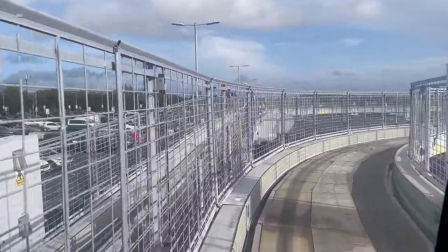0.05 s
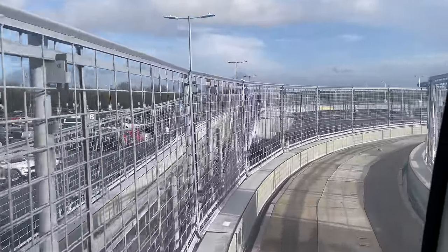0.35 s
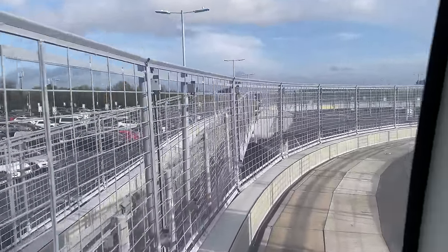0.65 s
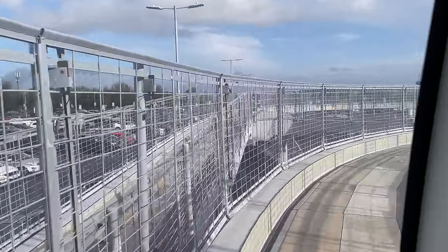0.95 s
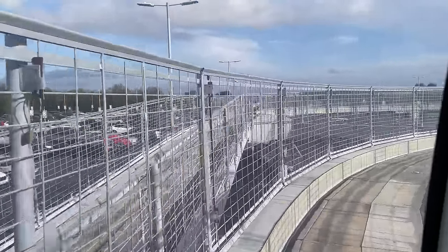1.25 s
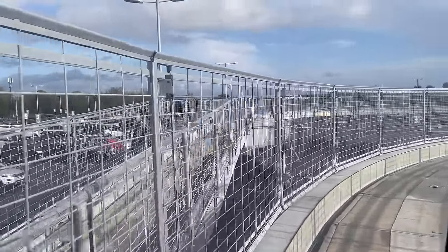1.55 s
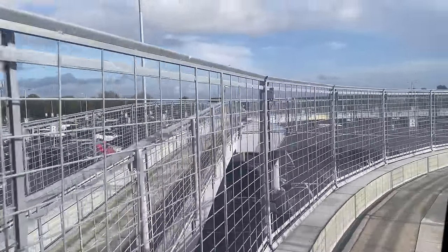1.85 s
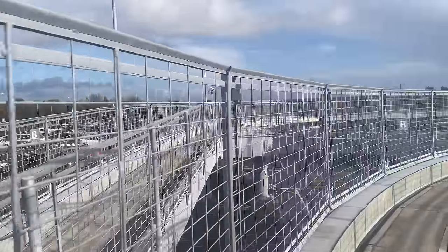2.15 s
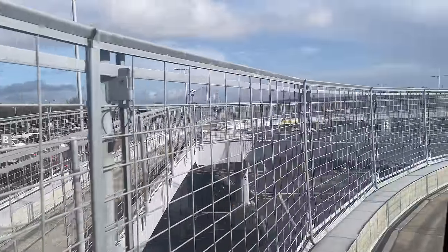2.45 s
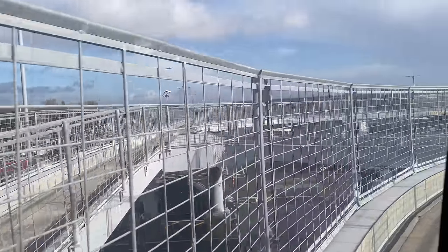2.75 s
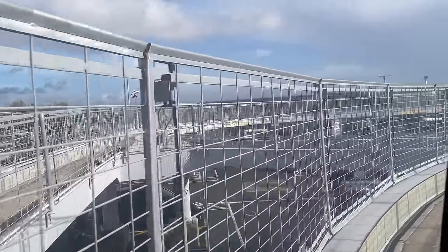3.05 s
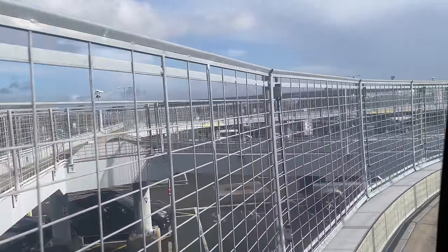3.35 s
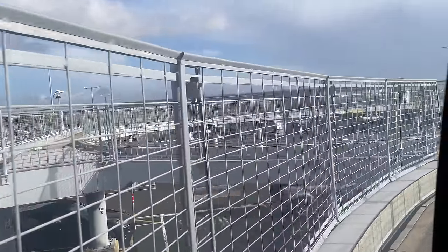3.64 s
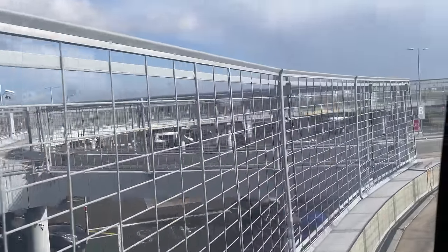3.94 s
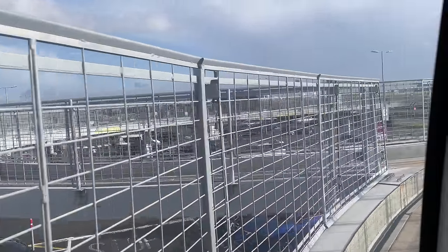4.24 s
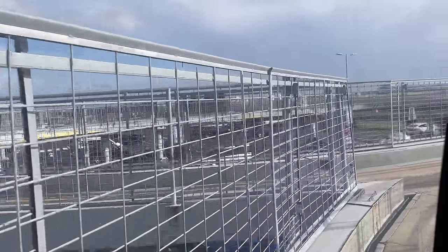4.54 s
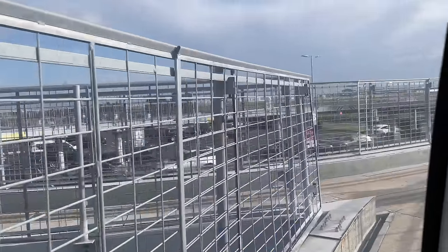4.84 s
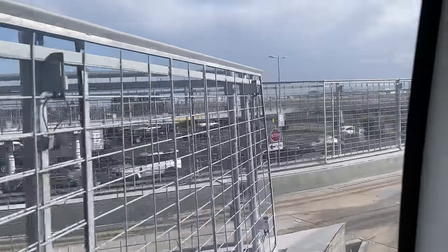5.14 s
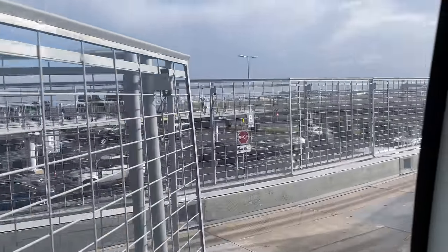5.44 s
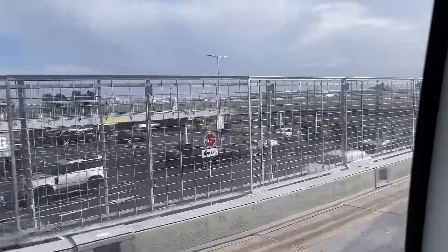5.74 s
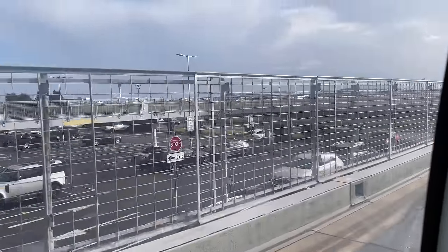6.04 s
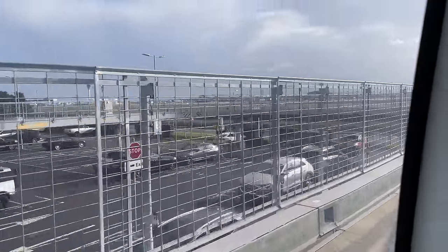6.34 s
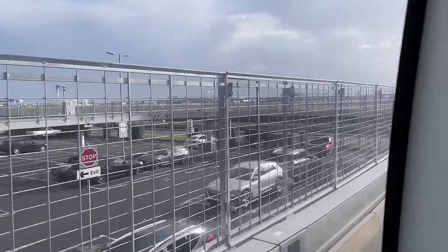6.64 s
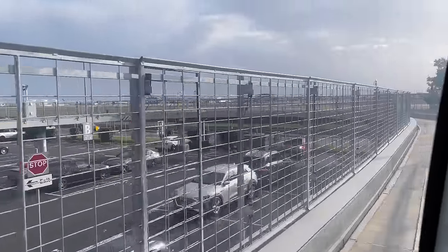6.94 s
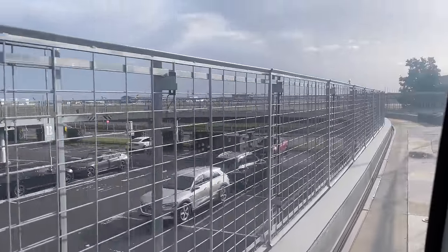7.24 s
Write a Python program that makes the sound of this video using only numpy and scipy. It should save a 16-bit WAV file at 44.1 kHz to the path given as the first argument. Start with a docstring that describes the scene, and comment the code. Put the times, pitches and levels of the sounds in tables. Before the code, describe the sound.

Steady low rumble inside a small vehicle on rubber tyres, with dull bumps over joints and light plastic rattles and clicks.

```python
"""Inside a small electric pod rolling on rubber tyres round a concrete guideway. From the start the road
shakes the body and makes the cabin boom, the tyres roar through its panels and thump over joints, and a
hard tick comes back with the turning wheels. Loose trim rattles and clicks in the bare, ringing cabin,
loudest at 1.4 s. At 3.4 s the coarsest concrete swells the roar and a hum. From 4.4 s the body shudders
harder and joints crowd in; later the trim squeaks, and the two heaviest thumps land near 7.2 s."""
import sys
import numpy as np
from scipy import signal
from scipy.fft import rfft, irfft, next_fast_len
from scipy.io import wavfile
from scipy.ndimage import uniform_filter1d, map_coordinates

SR = 44100
rng = np.random.default_rng(int(sys.argv[2]) if len(sys.argv) > 2 else 0)


def file_out(sig):
    """Save sig as 16-bit WAV at sys.argv[1]."""
    # one column per channel
    cols = np.atleast_2d(sig).T
    # limit, then scale
    lim = np.clip(cols, -1, 1)
    pcm = np.round(lim * 32767).astype(np.int16)
    wavfile.write(sys.argv[1], SR, pcm)


N = 321489


def amp(db):
    """Decibels to gain."""
    return 10 ** (np.asarray(db) / 20)


def unit(x):
    """Scale to rms 1."""
    return x / np.sqrt(np.mean(x ** 2) + 1e-20)


def along(points, hz):
    """Read (frequency, value) points on a log-frequency axis."""
    f, v = np.transpose(points)
    return np.interp(np.log(hz + 1), np.log(f), v)


def bell(hz, centre, octaves):
    """An EQ bell of height 1 on a log-frequency axis."""
    return np.exp(-.5 * (np.log2((hz + 1) / centre) / octaves) ** 2)


def envelopes(rows):
    """One envelope, a value per sample, for each column after the time."""
    times, *columns = np.transpose(rows)
    return [np.interp(np.arange(N) / SR, times, column) for column in columns]


def wobble(rate, size=N):
    """Smooth random modulation, rate knots a second."""
    knots = rng.standard_normal(int(size * rate / SR) + 4)
    return map_coordinates(knots, [np.arange(size) * rate / SR])


def filtered(x, response):
    """Filter x by a response given as a function of frequency."""
    n = x.shape[-1]
    padded = next_fast_len(n + 8192)
    return irfft(rfft(x, padded) * response(np.fft.rfftfreq(padded, 1 / SR)), padded)[..., :n]


def eq(x, curve):
    """Shape x with a curve of (frequency [Hz], gain [dB]) points."""
    return filtered(x, lambda hz: amp(along(curve, hz)))


def add(track, s, sound):
    """Mix a sound into a track at time s."""
    part = track[..., max(round(s * SR), 0):][..., :sound.shape[-1]]
    part += sound[..., :part.shape[-1]]


def stereo_noise(side_db, size=N):
    """Mid/side white noise; side_db sets the width."""
    mid, side = rng.standard_normal((2, size))
    return np.array([mid + amp(side_db) * side, mid - amp(side_db) * side])


def noise_bed(spectrum, side_db):
    """Coloured stereo noise whose slow level stays at rms 1."""
    x = eq(stereo_noise(side_db), spectrum)
    power = uniform_filter1d(np.mean(x ** 2, axis=0), size=SR // 8)
    return x / np.sqrt(np.abs(power) + 1e-20)


def ringing(modes, side_db):
    """Stereo noise of rms 1 in narrow resonances with steep skirts."""
    response = lambda hz: sum(amp(db) / (1 + ((hz - centre) / width) ** 2) for centre, width, db in modes)
    return unit(filtered(stereo_noise(side_db), response))


# reverb decay of the bare cabin (frequency [Hz], t60 [s])
CABIN_DECAY = [(300, 1), (1300, 0.23), (3500, 0.23), (9000, 0.3), (14000, 0.022)]
def cabin_tail(build_s=0.0009):
    """A fresh diffuse stereo tail of the cabin, energy about 1 a side."""
    hz, t, bands = signal.stft(rng.standard_normal((2, SR // 3)), SR, nperseg=256)
    decay = amp(-60 * t / along(CABIN_DECAY, hz)[:, None])
    tail = signal.istft(bands * decay, SR, nperseg=256)[1]
    tail *= 1 - np.exp(-np.arange(tail.shape[1]) / SR / build_s)  # reflections take a moment to gather
    return tail / np.linalg.norm(tail[0])


def reverb(x):
    """The cabin's stereo answer to a mono sound, fully wet."""
    return signal.fftconvolve(x[None], cabin_tail(), axes=1)


def near_walls(x, echo_db=-3, count=10):
    """Windows and seat backs return weak early copies, which colour the treble unevenly."""
    echoes = np.zeros((2, SR // 40))
    delays = rng.integers(SR // 1000, SR // 40, (2, count))
    echoes[[[0], [1]], delays] = amp(echo_db) * rng.choice([-1, 1], (2, count)) / np.sqrt(count)
    echoes[:, 0] = 1  # direct path
    return signal.fftconvolve(x, echoes / np.linalg.norm(echoes[0]), axes=1)[:, :N]


# tone of the trim, shared by tremble, clicks and rattles (frequency [Hz], gain [dB])
TRIM_EQ = [(400, -15), (1000, -8.5), (1600, 0), (2200, -1.5), (3000, -5), (4200, -4), (5500, -10),
           (7200, -13), (9400, -17.5), (11000, -20.5), (13000, -23.5), (15000, -38)]
# fader ride of the trembling fittings, highest as the pod leaves the bend (time [s], level [dB])
TREMBLE_LEVEL = [(0.0, -75.5), (4.0, -74.5), (4.7, -65), (5.8, -69.5), (6.4, -61), (6.85, -72.5),
                 (7.29, -62.5)]
def tremble(per_s=45, spread_db=4, direct_db=-12):
    """Small fittings touch at irregular moments: a fine chatter, heard mostly off the walls."""
    moments, sizes = rng.uniform(size=N), rng.standard_normal(N)
    touches = (moments < per_s / SR) * np.sign(sizes) * amp(spread_db * np.minimum(np.abs(sizes), 2))
    chatter = amp(direct_db) * touches + reverb(touches)[:, :N]
    return amp(envelopes(TREMBLE_LEVEL)[0]) * unit(eq(chatter, TRIM_EQ))


# squeaks of the trim (time of crest [s], level [dB], half length [s], pitch [Hz])
SQUEAKS = [(5.555, -56, 0.016, 2998), (5.968, -62, .007, 4670), (6.188, -62, .008, 4620),
           (6.646, -58, 0.037, 2078)]
def squeaks(waver=0.013, catch_db=3):
    """Rubbing trim sings for an instant on one unsteady note."""
    out, t = np.zeros(N), np.arange(N) / SR
    for s, db, half, hz in SQUEAKS:
        phase = 2 * np.pi * np.cumsum(hz * (1 + waver * wobble(120))) / SR
        swell = np.exp(-.5 * ((t - s) / half) ** 2)
        out += amp(db + catch_db * wobble(100)) * np.sin(phase) * swell
    return out


# dull and bright swishes are broader (centre [Hz], width [octaves])
SWISH_WIDTH = [(700, 0.51), (1400, 0.22), (4000, 0.77)]
# top-end roll-off of a swish (frequency [Hz], gain [dB])
SWISH_ROLLOFF = [(9700, -0.5), (11000, -7), (12600, -9.5), (13600, -14.5), (15000, -51.5)]
# soft swishes of noise (time of crest [s], level [dB], half length [s], centre [Hz])
SWISHES = [(0.077, -70, 0.037, 1980), (0.678, -61, .06, 4100), (1.303, -51.5, 0.064, 1360),
           (1.52, -40, 0.03, 700), (1.824, -46, 0.05, 1370), (1.829, -60, 0.05, 3080),
           (2.246, -45, 0.038, 1320), (2.274, -58.5, 0.015, 6360), (2.922, -62.5, 0.1, 5900),
           (3.378, -51.5, 0.14, 1420), (3.947, -59, 0.054, 6800), (4.301, -60.5, 0.085, 7100),
           (6.123, -57, 0.018, 2580), (6.329, -64, 0.032, 4400), (6.467, -46.5, 0.034, 1110)]
def swishes(grain_db=2):
    """Grainy bands of noise swell and fade; the dull one at 1.5 s is a tyre's slap on a joint."""
    out, t = np.zeros((2, N)), np.arange(-SR // 2, SR // 2) / SR
    for s, db, half, centre in SWISHES:
        octaves = along(SWISH_WIDTH, centre)
        band = lambda hz: bell(hz, centre, octaves) * amp(along(SWISH_ROLLOFF, hz))
        swell = np.exp(-.5 * (t / half) ** 2)
        swish = unit(filtered(rng.standard_normal((2, len(t))), band)) * swell
        add(out, max(s + t[0], 0), amp(db) * swish[:, t >= -s])
    return out * amp(grain_db * wobble(90))


# tone of the midrange rush and of the hiss on top (frequency [Hz], gain [dB])
RUSH_EQ = [(500, -30.5), (950, 2), (1250, 2.5), (1700, -3.5), (2300, -8.5), (3200, -16), (4500, -24),
           (8000, -45.5), (15000, -81.5)]
HISS_EQ = [(1200, -21.5), (2500, 0.5), (4000, 1.5), (5500, 1), (7500, -4), (9700, -3), (10800, -11),
           (12300, -6.5), (13500, -31), (15000, -47.5)]
def air(rush_db=-51, usual_roar_db=-40.5, follow=0.52, hiss_db=-69, flutter_db=1.85):
    """A diffuse rush that grows a little on coarse concrete, under a fine hiss; both flutter slightly."""
    coarseness_db = envelopes(ROAD_COARSENESS)[1] - usual_roar_db
    rush = amp(rush_db + follow * coarseness_db) * noise_bed(RUSH_EQ, side_db=0)
    flutter = amp(flutter_db * wobble(11))
    hiss = amp(hiss_db) * noise_bed(HISS_EQ, side_db=-1)
    return flutter * (rush + hiss)


# a fitting sticks and slips (time [s], level [dB], pitch [Hz])
CLICKS = [(0.0385, -44.5, 2020), (0.3605, -45, 1990), (2.0602, -47, 1730), (2.1692, -53, 1660),
          (2.4227, -43.5, 2010), (2.4332, -47, 2000), (2.4426, -37.5, 2310), (3.0622, -43, 2100),
          (3.4005, -38, 2120), (3.4112, -37, 1870), (4.135, -50, 2240), (4.1505, -48, 2170),
          (4.156, -42, 2250), (4.7112, -50, 2260), (4.7858, -45, 2440), (4.8098, -44, 2130),
          (5.6384, -38.5, 2470), (5.8235, -48.5, 2970), (6.344, -59, 6000), (6.457, -47.5, 7700),
          (6.5184, -42, 2000), (7.1212, -53, 2000)]
def clicks(t60=0.0066, rise_s=0.00041, crack_db=-17, room_db=-3):
    """Each slip of the fitting is one quickly damped note with a little crack and some cabin reverb."""
    out, t = np.zeros((2, N)), np.arange(SR // 20) / SR
    envelope = 1000 ** (-t / t60) * (1 - np.exp(-t / rise_s))
    for s, db, hz in CLICKS:
        crack = amp(crack_db) * rng.standard_normal(len(t))
        click = eq((np.sin(2 * np.pi * hz * t) + crack) * envelope, TRIM_EQ)
        click = amp(db) * click / np.abs(click).max()
        add(out, s, click)
        add(out, s, amp(room_db) * reverb(click))
    return out


# ring of one tick (frequency [Hz], level [dB], t60 [s])
TICK_MODES = [(650, -10.5, 0.02), (895, -5, 0.012), (1180, -0.5, 0.01), (1299, 1, 0.0095),
              (1530, -4.5, 0.008)]
# light touch, blow and two window echoes (time from the blow [s], level [dB])
TICK_TAPS = [(-0.004, -11), (0, -3.5), (0.008, -6.5), (0.017, -13.5)]
# wheel ticks, about four a second with gaps (time [s], level [dB])
WHEEL_TICKS = [(0.0991, -38.5), (0.385, -39.5), (0.647, -39), (0.8596, -34.5), (1.242, -39.5),
               (1.9587, -34), (2.4892, -39), (2.7055, -35.5), (3.144, -33), (3.6025, -37.5),
               (3.8866, -40.5), (4.081, -37), (4.309, -35), (4.576, -37.5), (5.042, -37), (5.2455, -32.5),
               (5.5231, -31.5), (5.764, -37.5), (5.9598, -41.5), (6.4479, -40.5)]
def wheel_ticks(gain_db=5, rise_s=0.0024, vary_db=1.2, detune=0.051):
    """A short hard tick of the turning wheels; a window throws it back before the cabin takes it up."""
    out, t = np.zeros((2, N)), np.arange(SR // 2) / SR
    for s, db in WHEEL_TICKS:
        ring = np.zeros(len(t))
        for hz, mode_db, t60 in TICK_MODES:
            strength = amp(mode_db + rng.normal(0, vary_db))
            ring += strength * np.sin(2 * np.pi * hz * rng.normal(1, detune) * t) * 1000 ** (-t / t60)
        ring *= 1 - np.exp(-t / rise_s)
        ring = amp(db + gain_db) * ring / np.abs(ring).max()
        for delay, tap_db in TICK_TAPS:
            add(out, s + delay, amp(tap_db) * ring)
        add(out, s, reverb(ring))
    return out


# resonances of the trim panels (frequency [Hz], level over the broad clatter [dB])
TRIM_MODES = [(1790, 0.5), (2100, 2), (2500, 1.5), (2900, 4), (3350, 0), (3800, -1), (4550, -4)]
def trim_ring(hz, width_hz=110, vary_db=3, detune=0.034):
    """Ringing response of the trim panels; each rattle finds the resonances a little different."""
    damping = 1j * hz * width_hz
    modes = [(f * rng.normal(1, detune), db + vary_db * rng.standard_normal()) for f, db in TRIM_MODES]
    return 1 + sum(amp(db) * damping / (f * f - hz * hz + damping) for f, db in modes)


def chatter(length_s, count=5, first_touch=0.33, dying=3.15, direct_db=-15, direct_hz=3600, grit_db=0.5):
    """A quick run of gritty contacts: dull on the direct path, bright off the cabin's hard walls."""
    run, t = np.zeros((2, SR // 2)), np.arange(SR // 2) / SR
    u = 2 * np.pi * direct_hz * t
    tap = amp(direct_db) * u * u * np.exp(-u)  # a soft contact of plastic
    for progress in np.arange(count) / count:
        strength = (first_touch + 2 * progress) * np.exp(-dying * progress)  # builds, then dies
        when = PRE_ROLL_S + progress * length_s * rng.uniform(.8, 1.2)
        add(run, when, strength * tap)
        add(run, when, strength * cabin_tail())  # each spot stirs the cabin differently
    return run * amp(grit_db * wobble(390, size=len(t)))


PRE_ROLL_S = 0.003  # room ahead of a rattle's first contact
# loose trim (time [s], level [dB], brightness [dB], body resonance [Hz], length of the run [s])
RATTLES = [(0.037, -39.5, -23.5, 1990, .018), (0.100, -45, -15.5, 2000, .02), (0.345, -51, -22, 3550, .024),
           (1.244, -42, -20, 5140, 0.043), (1.4228, -27, -15, 1900, 0.024), (1.49, -37, -19, 2840, .03),
           (1.524, -47, -8, 3400, 0.026), (1.616, -35, -13.5, 5200, .028), (2.205, -43, -40, 1900, 0.015),
           (2.223, -40.5, -34, 2490, 0.022), (2.289, -29.5, -14, 3330, 0.025),
           (2.436, -43, -15, 2270, .024), (3.091, -41.5, -5, 5900, .017), (3.16, -42.5, -16.5, 1910, .024),
           (3.376, -40, -9.5, 1860, .018), (3.399, -35.5, -23.5, 2000, 0.018), (3.74, -48, -11, 3940, .024),
           (4.304, -44, -20, 3400, .03), (4.340, -35.5, -30, 1990, .024), (4.504, -51.5, -12, 4070, 0.014),
           (4.783, -45, -20, 2410, .018), (4.878, -44.5, -16, 2080, .018), (5.028, -51, -18, 3000, 0.016),
           (5.226, -35, -13, 1830, .024), (5.271, -33, -28, 4300, 0.036), (5.447, -46, -8, 4670, 0.023),
           (5.5392, -46.5, -11, 6440, 0.022), (5.633, -45.5, -7.5, 2290, .02),
           (5.72, -46.5, -23, 2220, .024), (5.795, -44, -20.5, 1980, .022), (5.82, -51, -16, 4430, .012),
           (5.957, -46.5, -7, 5000, .026), (6.18, -40.5, -13.5, 8300, 0.039), (6.3, -50, -17, 4200, 0.025),
           (6.453, -42.5, -10, 1800, .01), (6.525, -44.5, -23, 1800, .02), (6.547, -46, 1, 4500, .016),
           (6.735, -42.5, -11, 1880, .022), (6.952, -48, -22, 2180, 0.035), (7.004, -46, -8.5, 1960, 0.029),
           (7.166, -39, -21, 1890, 0.042), (7.221, -35, -18, 1900, .03)]
def rattles(gain_db=-9.5, usual_top_db=-20, tilt=0.72, body_db=4.5, body_octaves=0.19):
    """Loose trim chatters, coloured by the panels' ring and the broad resonance of the loose piece."""
    out = np.zeros((2, N))
    for s, db, top_db, body_hz, length_s in RATTLES:
        hardness = [(3000, 0.0028), (9000, tilt * (top_db - usual_top_db))]  # harder is brighter
        body = lambda hz: body_db * bell(hz, body_hz, body_octaves)
        tone = lambda hz: trim_ring(hz) * amp(along(TRIM_EQ, hz) + along(hardness, hz) + body(hz))
        rattle = filtered(chatter(length_s), tone)
        attack_rms = np.std(rattle[:, :SR // 30])
        add(out, s - PRE_ROLL_S, amp(db + gain_db) * rattle / attack_rms)
    return out


# tone of the tread's slap (frequency [Hz], gain [dB])
SLAP_EQ = [(100, -33), (250, -1.5), (315, 1.5), (358, 5), (410, -8), (500, -8), (850, -15.5), (1500, -30),
           (6000, -120)]
# tyres meeting joints (time [s], thump level [dB], pitch [Hz], slap level [dB])
JOINTS = [(0.053, -12.5, 71.7, -33.5), (0.84, -9.5, 56, -57), (1.506, -12.5, 61.5, -46),
          (2.227, -13, 78, -36), (3.491, -15.5, 84.6, -51), (4.328, -12, 63.6, -40), (4.734, -11, 104, -34),
          (4.821, -20, 106.5, -37.5), (5.231, -18.5, 72.3, -36.5), (5.335, -17.5, 104, -43),
          (5.41, -23, 102.8, -40.5), (5.52, -9.5, 44, -35.5), (5.728, -9.5, 69.7, -28.5),
          (5.878, -16, 111.5, -34.5), (6.949, -10, 99.5, -37), (7.170, -6.5, 107, -28.5),
          (7.207, -5.5, 84.5, -35.5)]
def joints(thump_gain_db=2.5, thump_t60=0.14, slap_t60=0.29, rise_s=0.0032):
    """A joint gives the body one low, quickly damped thump, with a dull slap of the tread."""
    out, t = np.zeros((2, N)), np.arange(SR // 3) / SR
    attack = 1 - np.exp(-(t / rise_s) ** 2)  # soft rubber takes up the load gradually
    for s, db, hz, slap_db in JOINTS:
        thump = -np.sin(2 * np.pi * hz * t) * 1000 ** (-t / thump_t60)
        slap = unit(eq(stereo_noise(side_db=-7, size=len(t)), SLAP_EQ)) * 1000 ** (-t / slap_t60)
        add(out, s, (amp(db + thump_gain_db) * thump + amp(slap_db) * slap) * attack)
    return out


# tone of the tyres' drone and the tread's roar (frequency [Hz], gain [dB])
DRONE_EQ = [(80, -18.5), (115, -2.5), (143, 1.5), (175, -7.5), (205, -7.5), (240, -15.5), (290, -18.5),
            (330, -27), (450, -37), (1600, -120)]
ROAR_EQ = [(150, -7.5), (300, -4.5), (450, -6.5), (560, -0.5), (670, 1), (820, 1.5), (960, -8.5),
           (1300, -17), (8000, -120)]
# resonances of the body panels, the hum and the whine (centre [Hz], width [Hz], level [dB])
PANEL_MODES = [(363.5, 7, -2.5), (406.5, 12, -5.5), (457.5, 13, -6)]
HUM_MODES = [(511, 28, 0), (555, 24, 3.5)]
WHINE_MODES = [(782, 43, 2.5), (836, 33, -3)]
# fader rides of the hum, cresting on the coarsest stretch, and the whine (time [s], level [dB])
HUM_LEVEL = [(0.0, -58), (1.2, -55), (2.2, -50.5), (2.7, -53), (3.4, -42), (3.8, -47), (4.2, -54.5),
             (7.29, -60)]
WHINE_LEVEL = [(0.0, -68), (1.6, -54), (2.3, -51.5), (3.4, -58.5), (4.1, -55), (4.6, -52), (5.6, -50.5),
               (6.5, -60), (7.29, -51.5)]
# coarseness of the concrete (time [s], drone level [dB], roar level [dB])
ROAD_COARSENESS = [(0.0, -24.5, -37), (0.3, -27.5, -44), (1.3, -28, -42), (1.5, -22.5, -37),
                   (1.8, -25.5, -42.5), (2.3, -25, -39.5), (2.6, -23, -40), (3.4, -19, -36.5),
                   (3.9, -23, -41.5), (5.1, -24, -41.5), (5.3, -23, -42), (5.9, -25.5, -42),
                   (6.6, -25, -41.5), (7.29, -25, -40)]
def tyres(drone_gain_db=-3, tread_gain_db=-6, panel_gain_db=-9, patchy_db=1.42, waver_db=2):
    """Coarse concrete drives the tyres' drone, the tread's roar, ringing panels and two narrow tones."""
    drone_db, roar_db = envelopes(ROAD_COARSENESS)
    patches = amp(patchy_db * wobble(7))
    drone = amp(drone_db + drone_gain_db) * noise_bed(DRONE_EQ, side_db=-16)
    tread = amp(roar_db + tread_gain_db) * noise_bed(ROAR_EQ, side_db=-4)
    panels = amp(roar_db + panel_gain_db) * ringing(PANEL_MODES, side_db=-0.5)
    hum = amp(envelopes(HUM_LEVEL)[0]) * ringing(HUM_MODES, side_db=-2)
    whine = amp(envelopes(WHINE_LEVEL)[0] + waver_db * wobble(6.9)) * ringing(WHINE_MODES, side_db=2)
    return patches * (drone + tread + panels) + hum + whine


# low-end tone of the body's shudder and the cabin's boom (frequency [Hz], gain [dB])
SHUDDER_EQ = [(15, -42.5), (25, -16.5), (33, -1.5), (41, 12.5), (50, 19.5), (60, -2), (90, -56),
              (200, -120)]
BOOM_EQ = [(35, -29.5), (48, 9), (57, 11), (72, 16), (90, 8), (110, 8.5), (128, -12), (200, -64),
           (400, -120)]
# swells and dips of the low shudder and boom (time [s], level [dB])
SHUDDER_LEVEL = [(0.0, -25.5), (0.7, -29.5), (0.9, -19.5), (1.3, -29.5), (1.6, -20.5), (2.6, -31),
                 (3.5, -29.5), (3.6, -36), (4.4, -17.5), (4.5, -32), (4.8, -13), (5.0, -27), (5.6, -16.5),
                 (5.9, -36.5), (6.0, -24.5), (6.5, -23), (6.7, -34), (7.29, -27)]
BOOM_LEVEL = [(0.0, -20), (0.8, -17.5), (1.3, -21.5), (2.3, -17), (2.5, -18.5), (3.2, -18.0), (5.5, -21),
              (5.7, -20), (6.0, -21), (6.8, -20), (7.29, -16)]
def rumble(shudder_gain_db=-4, boom_gain_db=-2, sway_db=0.5, throb_db=0.56):
    """The body shudders on its springs and the cabin air booms, nearly mono; both throb at random."""
    shudder_db = envelopes(SHUDDER_LEVEL)[0] + shudder_gain_db + sway_db * wobble(1.4)
    shudder = amp(shudder_db) * noise_bed(SHUDDER_EQ, side_db=-23)
    boom_db = envelopes(BOOM_LEVEL)[0] + boom_gain_db + throb_db * wobble(11)
    boom = amp(boom_db) * noise_bed(BOOM_EQ, side_db=-18.5)
    return shudder + boom


# stereo phase shift that widens the road noise's midrange (frequency [Hz], left lead [rad])
LEFT_PHASE = [(380, 0), (550, -1.46), (720, -2.5), (1200, -5.5), (1600, -5.5)]
# stereo balance beside the near wall (frequency [Hz], left over right [dB])
LEFT_BALANCE = [(40, 1.5), (110, 1.5), (200, 4.5), (290, 8), (380, 11), (520, 4.5), (700, 3.5), (1200, 0),
                (2200, -0.5), (9000, -0.5)]
def scene():
    """The mix: widened road noise plus cabin sounds; the near wall lifts the low mids on the left."""
    split = [.5, -.5]  # half to the left, the opposite half to the right
    road = rumble() + tyres() + joints() + near_walls(air() + swishes() + tremble())
    road = filtered(road, lambda hz: np.exp(1j * np.outer(split, along(LEFT_PHASE, hz))))
    pod = road + wheel_ticks() + rattles() + clicks() + squeaks()
    return filtered(pod, lambda hz: amp(np.outer(split, along(LEFT_BALANCE, hz))))


def record(dry, fade_s=0.004, top_hz=15000):
    """The master: a click-free fade-in and a brick-wall high cut."""
    fade = np.sin(np.pi / 2 * np.minimum(np.arange(N) / SR / fade_s, 1)) ** 2
    return filtered(dry * fade, lambda hz: hz < top_hz)


dry = scene()
out = record(dry)
file_out(out)
```